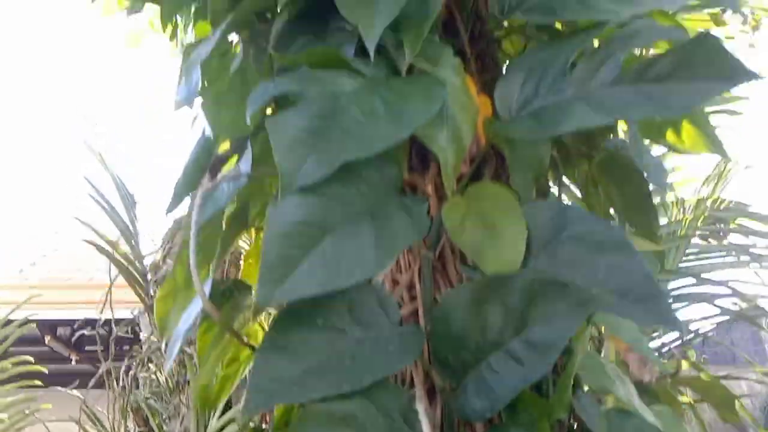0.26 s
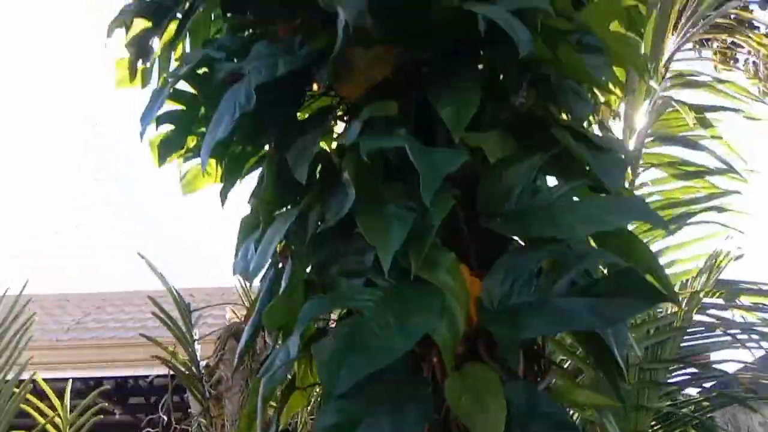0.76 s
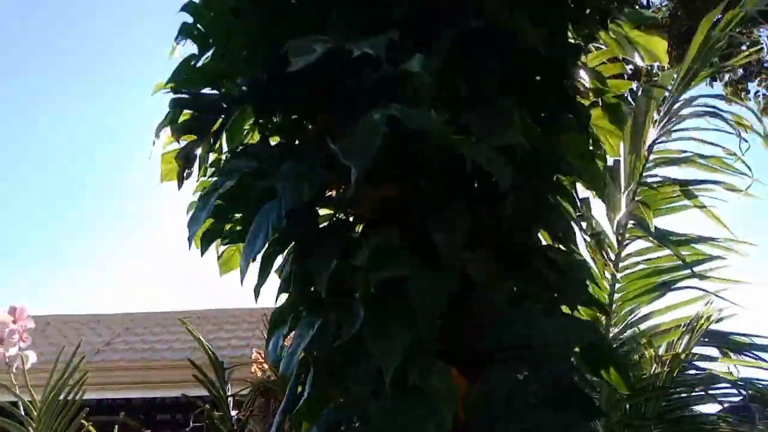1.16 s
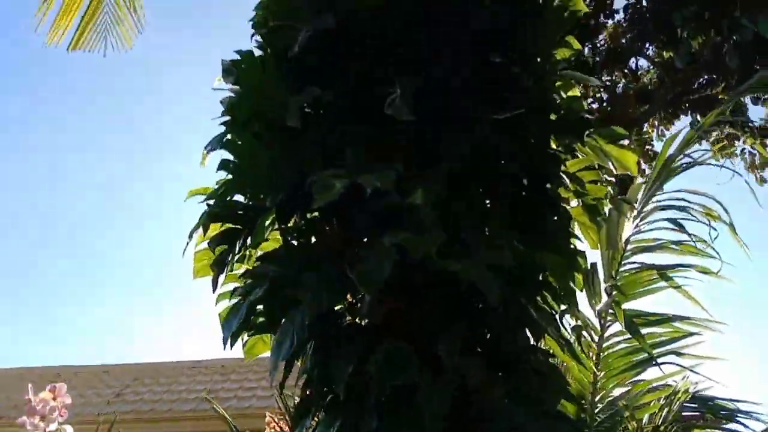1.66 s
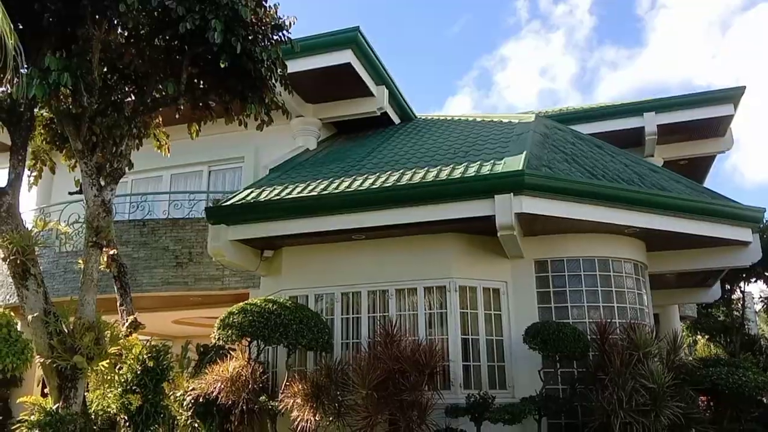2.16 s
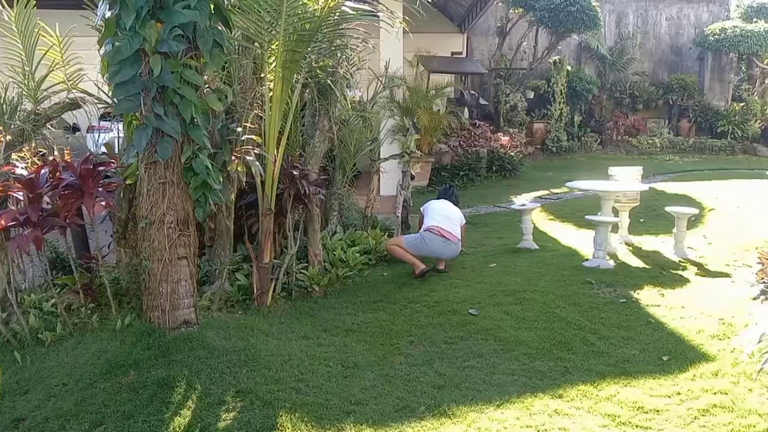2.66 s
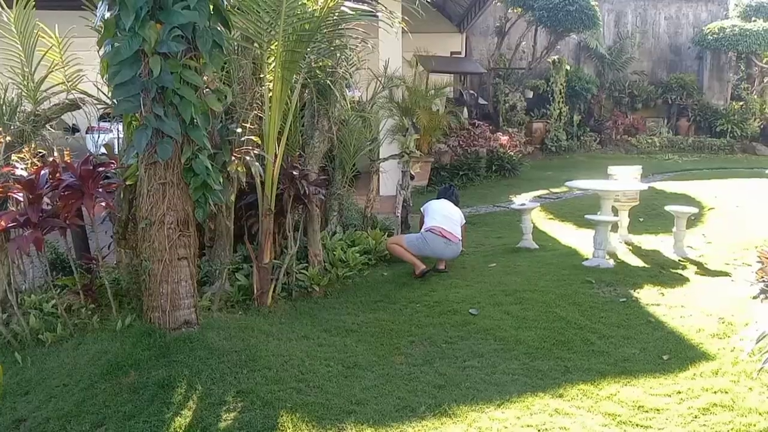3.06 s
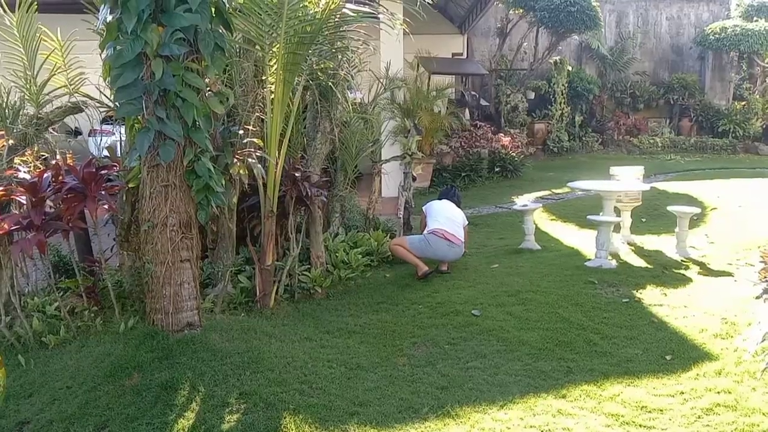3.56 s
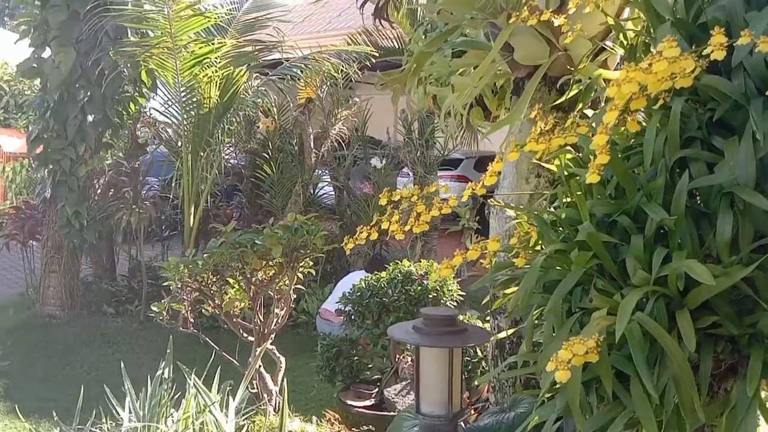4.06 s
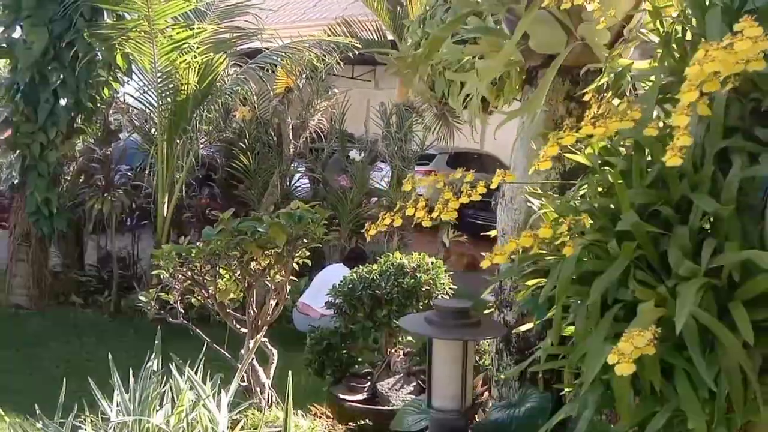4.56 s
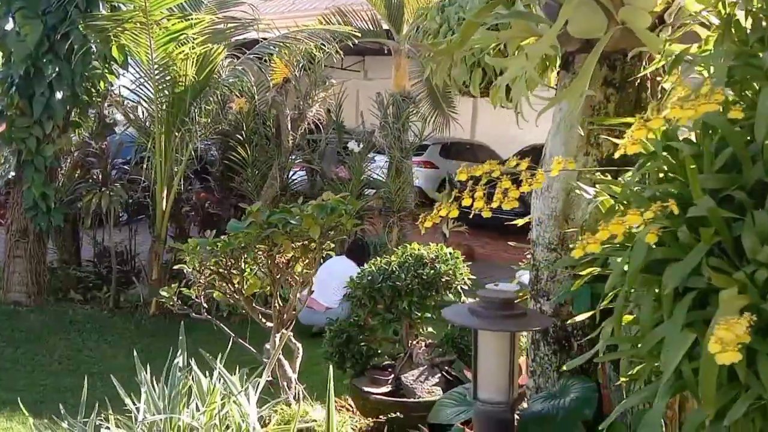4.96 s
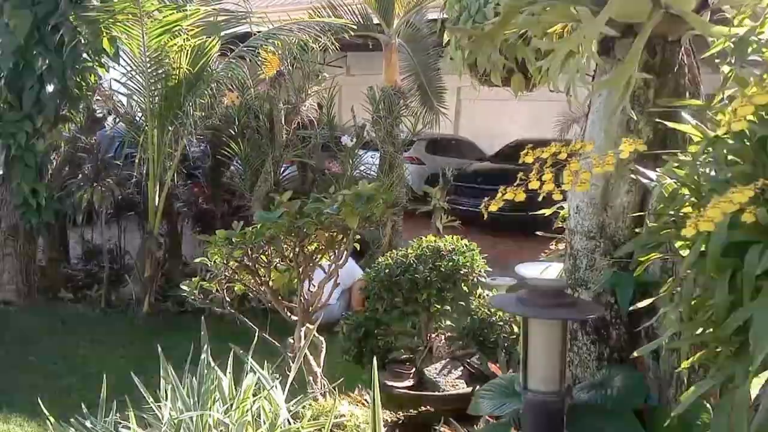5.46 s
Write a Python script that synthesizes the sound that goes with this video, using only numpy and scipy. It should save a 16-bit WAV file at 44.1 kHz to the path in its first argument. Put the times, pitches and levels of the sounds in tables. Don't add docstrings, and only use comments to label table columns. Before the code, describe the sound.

Long-bladed hand shears cut grass close to a small microphone in a quiet garden. At once a scrape leads to a double clack around 0.25 s, with an opening rasp at 0.35, another clack at 0.56 and a harder one at 0.87. A tight cluster of clacks and grinding follows from 1.14 to 1.3 s, with strong grass rustle, then a brief lull of soft brushing. Snips return at 1.8-1.9 s, with a rasp near 2.07. Then brighter, more separate cuts fall at about 2.56, 2.85, 3.32 and 3.6 s. After a pause with light ticks, a loud clack lands at 4.41 s, with a reopening rasp. Stalks snap and hiss along the blades throughout; grips hum softly in the first second and later knock dully. From 4.7 to the end, only faint sweeps over grass, tiny ticks, thin airy hiss and weak low rumble remain.

```python
import sys
import numpy as np
from scipy import signal
from scipy.fft import rfft, irfft
from scipy.io import wavfile
from scipy.ndimage import uniform_filter1d

SR = 44100
rng = np.random.default_rng(int(sys.argv[2]) if len(sys.argv) > 2 else 0)


def unload_wav(signal):
    wavfile.write(
        sys.argv[1],
        SR,
        np.round(np.clip(np.atleast_2d(signal).T, -1, 1) * 32767).astype(np.int16),
    )


def amplitude_ratio(level_db):
    exponent = np.asarray(level_db, float) / 20
    return 10 ** exponent


N = 252252

# t/s, level/dB
RUMBLE_LEVEL = [(0, -59.5), (.13, -54.5), (.83, -54.5), (.87, -61.5), (1.1, -62.5), (1.55, -58.5),
                (1.75, -69), (2.1, -61.5), (2.5, -71.5), (2.66, -61.5), (3.2, -66), (3.45, -62),
                (3.8, -61.5), (4, -69.5), (4.2, -61.5), (4.58, -58.5), (4.65, -72), (5.72, -67.5)]
# f/Hz, density/dB per Hz
AIR_SPECTRUM = [(290, -35.5), (500, -4.5), (1990, -9), (3100, -6), (4020, -17.5), (6640, -2), (15500, -20)]
# f/Hz, width/Hz, level/dB
LEANING_MODES = [(5660, 180, -10.5), (6960, 520, 4.5), (8000, 250, -9), (10130, 250, -7), (10500, 250, -11)]

# f/Hz, width/Hz, level/dB
GRASS_LOW_MODES = [(2000, 500, -11), (2700, 400, -6), (3400, 550, 0)]
GRASS_BODY_MODES = [(5100, 450, -2), (5700, 500, 0), (6400, 450, -1), (7050, 450, -4)]
GRASS_TOP_MODES = [(8360, 510, -14), (10100, 600, -10.5), (12000, 9900, -2), (14300, 2000, -4)]
# f/Hz, width/Hz, level/dB
GRASS_PRESSED_MODES = [(1400, 350, -0.5), (2300, 450, -3), (3600, 800, 0)]
# t/s of most pressure, level/dB, low modes rel/dB,
# rise/ms per 10 dB, fall/ms per 10 dB
GRASS_STROKES = [(0.062, -33, -5.5, 38, 64), (0.239, -29.5, -8, 25.5, 9), (0.349, -28, -8.5, 27, 20),
                 (.65, -32.5, -9, 47.5, 50.5), (.87, -43, 0, 44.5, 49), (0.959, -35, -1.5, 15.5, 26),
                 (1.261, -23, -11, 26.5, 18), (1.888, -25, -11.5, 8.5, 15.5), (2.041, -29.5, -43, 19, 32.5),
                 (2.079, -35, 1.5, 24, 21), (2.2, -54, -2.5, 4, 22), (2.543, -37, -3.5, 13.5, 32),
                 (2.64, -56, -7, 66, 37), (2.849, -39, -4, 26, 54), (2.939, -43, 0, 66, 56.5),
                 (3.33, -43.5, 1.5, 14, 66.5), (3.61, -44.5, -0.5, 85.5, 32), (3.711, -39.5, -3, 64.5, 47),
                 (4.401, -31, -8, 30, 25.5), (4.48, -31.5, -4, 20, 27.5)]
# start t/s, hold/s, level/dB, low modes rel/dB
PRESSED_HOLDS = [
    (0.537, 0.062, -48.5, 1.5),
    (0.709, 0.074, -46, -6),
    (1.148, 0.055, -37.5, -4.5),
    (1.494, 0.11, -66.5, 11.5),
    (1.706, 0.061, -72.5, 16),
    (1.817, 0.059, -47, 3),
    (1.95, 0.11, -59.5, 4),
]
# start t/s, hold/s, level/dB, top modes rel/dB, fall/ms per 10 dB
LAWN_SWEEPS = [
    (1.364, 0.19, -48.5, -4.5, 44),
    (3.397, 0.12, -43.5, -4, 59),
    (3.81, 0.063, -83, 24, 85),
    (4.138, 0.17, -51.5, -1, 28.5),
    (4.857, 0.16, -65.5, 0, 57),
    (5.034, 0.1, -57.5, -2.5, 52),
    (5.72, 0.015, -55.5, -1.5, 44),
]
# t/s, gain of the top modes/dB
BLADE_FACING = [
    (0, -15),
    (.6, -13),
    (1.25, -11.5),
    (1.9, -11.5),
    (2.2, -3.5),
    (2.55, 1),
    (3.0, -0.5),
    (3.7, -3.5),
    (4.5, -6.5),
]

# f/Hz, width/Hz, level/dB
STEEL_LOW_MODES = [(1020, 310, -8.5), (1275, 570, 3), (1834, 750, 0.5)]
STEEL_BODY_MODES = [(2226, 680, -5), (2903, 970, -1.5), (3620, 930, -1.5), (4311, 720, -3.5),
                    (4780, 1400, 3), (5482, 870, 1), (6030, 730, 1.5), (6714, 880, 3.5), (7820, 740, -2.5)]
STEEL_TOP_MODES = [(8800, 600, -7), (9600, 600, -6), (10900, 700, -4), (11900, 700, 0), (13100, 800, 1),
                   (14400, 850, -2)]
# f/Hz, width/Hz, level/dB
GRIP_MODES = [(514, 110, -32.5), (687, 94, -38), (907, 200, -25.5)]
# t/s, peak level/dB, low modes rel/dB, fall/ms per 10 dB
HARD_CLACKS = [(0.229, -10, -11.5, 2.5), (0.259, -9, -6, 6.5), (0.563, -7.5, -5.5, 7.5),
               (0.8722, -6.5, -0.5, 2), (0.877, -12, -7.5, 4), (0.957, -22.5, -13, 13),
               (1.1414, -12.5, -13, 5), (1.1837, -6, -3.5, 3), (1.193, -19.5, -15, 7.5),
               (1.2411, -18, -23.5, 14.5), (1.2989, -7.5, -16, 5), (1.7805, -18.5, -2.5, 11.5),
               (1.9094, -18, -20.5, -0.5), (1.9129, -13, -8, 7.5), (2.558, -11, -2.5, 7),
               (2.5668, -21.5, -4.5, 13), (2.8468, -10.5, 1.5, 5.5), (2.8526, -11, -11, 5),
               (3.324, -6.5, -4.5, 9), (3.6078, -8.5, -5.5, 7), (3.679, -30.5, -39, 12),
               (3.7695, -22.5, -19, 9), (4.4104, -4, -7.5, 3), (4.417, -7.5, -19, 5),
               (4.509, -29.5, -6.5, 14.5)]
# t/s, peak level/dB, low modes rel/dB, brightness/dB
LIGHT_TICKS = [(0.2131, -25, -30.5, -14), (0.7344, -25, -13.5, -5), (0.8194, -27.5, -18, -4.5),
               (1.1115, -33, -27.5, -24), (1.259, -33, 8.5, 26.5), (2.102, -22, -9, -6),
               (2.204, -39, -35, -9), (2.4156, -67, -28, 12), (2.4912, -50.5, -14, -4),
               (2.6512, -27, -8, 7.5), (2.759, -49.5, -4, 0), (2.8174, -33.5, -12, 6.5),
               (2.996, -29, -20.5, 2.5), (3.0589, -44, -28, 1), (3.842, -70, -18, 27.5),
               (3.887, -61, -7, 19), (4.002, -51, -19, 2), (4.191, -29, -19, -22), (4.5776, -43, -25, -3),
               (4.632, -54.5, -25, 1), (5.3908, -68, -28.5, 10), (5.449, -57, -7, -3.5)]
# t/s, peak level/dB, low modes rel/dB, brightness/dB
STALK_SNAPS = [(.057, -16.5, -22, -7), (.301, -34.5, -3.5, 0), (.3245, -25.5, -36, 0),
               (.4368, -44, -28, -9), (.538, -38.5, -21.5, -5.5), (.549, -35.5, -15, -5),
               (.626, -22.5, -11, 6), (.6448, -31.5, -14, -17), (.7265, -43, 0, 0),
               (1.224, -33, -11.5, -0.5), (1.2825, -20, -9, -0.5), (1.3625, -36, -9.5, -3),
               (1.384, -35, -23, -3.5), (1.814, -37, -13, -6), (1.8445, -23.5, -21, -4),
               (1.9015, -23, -16, -9), (2.0225, -28, -30, -14), (2.046, -29, -33, -2.5),
               (2.0665, -19.5, -4.5, -11), (2.5975, -32.5, -29, -2.5), (2.6285, -26, -20.5, -6),
               (2.833, -24.5, -20, -0.5), (2.8705, -34.5, -34, 0), (2.8738, -31, -25.5, 2.5),
               (2.9145, -34.5, -21.5, 4), (3.053, -43, -18, -2), (3.418, -25.5, -1.5, 16.5),
               (3.58, -38, -29, 5), (3.6115, -15.5, -25, 6), (3.6855, -28, -22.5, 8.5),
               (3.692, -32, -31, 13), (3.7855, -47, -18, 12), (4.368, -43, -12, -5),
               (4.555, -53, -23, 11.5)]
# peak t/s, level/dB, low modes rel/dB, spread/ms per 10
# dB
CLOSING_RASPS = [(0.2436, -11, -13.5, 7.5), (0.5227, -44, 7.5, 19.5), (0.5447, -22.5, -8, 15.5),
                 (0.7753, -38.5, -22, 5.5), (0.8422, -25, -6.5, 18.5), (0.8587, -35.5, 0.5, 6.5),
                 (1.166, -23, 1, 13), (1.8433, -16, -4.5, 7.5), (1.8664, -25, -1, 0),
                 (1.8846, -25.5, 1.5, 24), (2.193, -50, -37, -2), (2.5419, -20, -5, 8),
                 (2.6112, -17.5, -20, 9.5), (2.8354, -25, -2.5, 11), (3.269, -50, -33, 5),
                 (3.3144, -20, -6, 12), (3.596, -26, -4.5, 9.5), (4.1522, -49.5, -22, 34),
                 (4.395, -26.5, 0.5, 16), (4.4685, -18.5, -25, 7.5)]
OPENING_RASPS = [(0.0648, -19.5, -13, 13), (0.3264, -30, -42, 5.5), (0.3333, -16, -52, 0.74),
                 (0.3494, -19.5, -20, 13), (0.365, -26.5, -3, 12), (0.376, -34.5, 4.5, 22),
                 (0.4438, -52, -31, 8), (0.6468, -14, -13.5, 10.2), (.661, -36.5, 5.5, 39),
                 (0.984, -46, 10.5, 20.6), (0.9925, -24, -2, 0.64), (1.2085, -31.5, 2, 5.4),
                 (1.273, -22, -8, 23), (1.2847, -32.5, -5, 2.1), (1.9548, -50, 3, 10),
                 (2.0305, -33, -32, 13), (2.0673, -46, -22, 11), (2.081, -20.5, -41, 3.3),
                 (2.134, -50, 2, 6.6),
                 (2.6325, -22.5, -10.5, 23), (2.669, -43.5, -8, 34), (2.8713, -24.5, 6, 0.99),
                      (2.9012, -31, -22, 25), (2.9298, -24.5, -8, 12), (2.975, -45, 2, 6.3),
                      (2.984, -35, -9.5, 3.4), (3.356, -39, -1, 18), (3.3897, -32, -34.5, 20),
                      (3.4047, -36.5, -39.5, 13), (3.4205, -25.5, -11.5, 11), (3.4427, -46.5, -5, 43),
                      (3.685, -28.5, -40, 14), (3.7135, -20, -5, 10.7), (4.4861, -20.5, -21, 8.6)]
# t/s, f/Hz, level over the other modes/dB
SINGING_MODES = [(0.057, 4900, 2.5), (0.065, 6700, 4), (0.066, 2170, 15), (0.068, 5550, 17),
                 (0.23, 5450, 19), (0.242, 5800, 10), (0.245, 2344, 23), (0.26, 2890, 13.5),
                 (0.26, 7250, 14), (0.263, 12000, -1), (0.347, 5360, 14), (0.354, 2220, 12),
                 (0.365, 2400, 21.5), (0.368, 5570, 11.5), (0.382, 1360, 24.5), (0.511, 1430, 25),
                 (0.535, 1440, 14.5), (0.553, 5060, 16.5), (0.565, 1220, 11), (0.64, 6900, 7.5),
                 (0.646, 4870, 19.5), (0.649, 2230, 18.5), (0.661, 5500, 19), (0.676, 1330, 20),
                 (0.737, 5180, 26), (0.842, 5560, 9.5), (0.874, 1187, 15), (0.873, 3237, 8.5),
                 (0.874, 5410, 6.5), (0.965, 2280, 28.5), (1.144, 1190, 14.5), (1.145, 5960, 6),
                 (1.16, 5450, 13.5), (1.162, 6540, 9.5), (1.166, 2470, 20.5), (1.186, 1210, 5.5),
                 (1.231, 1380, 15.5), (1.244, 6630, 12), (1.251, 1700, 17), (1.26, 5650, 13.5),
                 (1.273, 5860, 7.5), (1.285, 5120, 17), (1.3, 5970, 22), (1.301, 15400, 15.5),
                 (1.302, 2950, 21.5), (1.781, 5210, 19.5), (1.784, 1350, -3), (1.784, 6840, 15.5),
                 (1.826, 1390, 18.5), (1.844, 1333, 29), (1.845, 5950, 5), (1.883, 1690, 45),
                 (1.886, 4940, 13), (1.889, 5860, 12.5), (1.916, 1240, 5), (1.916, 3430, 5),
                 (1.916, 5450, 9),
                 (2.047, 13700, 16), (2.067, 1770, 18.5), (2.067, 4880, 21), (2.069, 3730, 16),
                      (2.081, 6300, 12), (2.08, 14740, 5), (2.076, 1050, -18), (2.083, 1740, 9),
                      (2.101, 1365, 14), (2.102, 5340, 24), (2.545, 6010, 9), (2.559, 7110, 5.5),
                      (2.61, 7000, 11), (2.611, 11720, 6.4), (2.632, 13670, 14), (2.633, 2200, 8.7),
                      (2.654, 10940, 6.6), (2.835, 4704, 12), (2.851, 1220, 15), (2.852, 7635, 10.6),
                      (2.931, 3573, 10), (2.998, 13100, 15), (3.311, 2930, 9.5), (3.313, 4917, 10),
                      (3.328, 8020, 7), (3.328, 13500, 6), (3.404, 13200, 15), (3.42, 13090, 13),
                      (3.583, 4670, 20), (3.593, 13020, 13), (3.599, 4740, 11), (3.609, 1270, 12),
                      (3.61, 3510, 9.9), (3.683, 1540, 18), (3.688, 13820, 7.7), (3.688, 14970, 11),
                      (3.707, 4624, 24), (3.712, 1050, -17), (4.003, 7570, 22), (4.193, 3126, 34),
                      (4.193, 4680, -7), (4.381, 6030, 13), (4.394, 5790, 11), (4.41, 3043, 16),
                      (4.41, 6090, 14), (4.413, 1160, 20), (4.419, 9050, 9), (4.421, 14800, 11),
                      (4.468, 6880, 26), (4.484, 6050, 8), (4.487, 3453, 13), (4.489, 2274, 18),
                      (4.579, 6740, 31.5), (4.634, 7000, 22)]

# start t/s, length/s, level/dB, f/Hz
GRIP_HUMS = [
    (.13, .1, -62, 430),
    (0.144, 0.08, -67.5, 528),
    (0.236, 0.12, -54.5, 422),
    (.38, 0.16, -66, 546),
    (0.483, 0.042, -63, 395),
    (0.555, .14, -53, 400.3),
    (.58, .09, -54, 320),
    (.69, 0.13, -51, 331),
    (.7, 0.22, -54.5, 392),
]
# t/s, peak level/dB, f/Hz, t60/s
GRIP_KNOCKS = [(1.782, -35.5, 690, 0.051), (1.851, -48.5, 486, 0.26), (2.067, -42, 885, 0.13),
               (2.563, -39, 449, 0.15), (2.614, -40, 418.5, 0.16), (2.678, -45, 425, 0.083),
               (2.85, -48.5, 466, 0.16), (3.328, -43, 420, 0.34), (3.418, -37, 905, 0.1),
               (3.613, -30.5, 427, 0.071), (4.412, -41, 430, 0.12)]


def rms_one(x):
    return x / np.sqrt(np.mean(x ** 2) + 1e-20)


def drift(rate):
    r = np.exp(-32 * np.pi * rate / SR)
    slow = signal.lfilter([1], [1, -2 * r, r * r], rng.standard_normal(N // 16 + 3002))[3000:]
    return np.interp(np.arange(N) / 16, np.arange(len(slow)), rms_one(slow))


def grit(shape, spread_db):
    grain_db = spread_db * np.minimum(rng.exponential(1, shape), 5)
    return rms_one(rng.standard_normal(shape) * amplitude_ratio(grain_db))


def resonate(x, hz, width):
    r = np.exp(-np.pi * width / SR)
    b = [1 - r * r, 0, r * r - 1]
    a = [2, -4 * r * np.cos(2 * np.pi * hz / SR), 2 * r * r]
    once = signal.lfilter(b, a, x + 1e-18)
    return signal.lfilter(b, a, once) * np.sqrt(2 * SR / (np.pi * width))


def gliding(x, hz, width):
    r = np.exp(-np.pi * width / SR)
    turn = np.exp(2j * np.pi * np.cumsum(hz) / SR)
    smooth = signal.lfilter([1], [1, -2 * r, r * r], x / turn)
    return rms_one((smooth * turn).real)


def rustle(modes, level_db, patchy_db, wander=0):
    flicker = [amplitude_ratio(patchy_db * drift(9)) for mode in modes]
    rings = 0
    for gain, (hz, width, db) in zip(flicker, modes):
        grains = grit(N, spread_db=2.0)
        if wander == 0:
            ring = resonate(grains, hz, width)
        else:
            ring = gliding(grains, hz * np.exp(wander * drift(3)), width)
        rings = rings + amplitude_ratio(db) * gain * ring
    return amplitude_ratio(level_db) * rms_one(rings)


def rumble():
    t = np.arange(N) / SR
    low_db = np.interp(t, *np.transpose(RUMBLE_LEVEL))
    settled_s = t - .845
    grip_db = low_db + np.where(settled_s < 0, -3, -6.5 - 2 * settled_s)
    low_modes = [(66, 50, -8), (92, 45, -7), (160.9, 150, -10.5)]     # f/Hz, width/Hz, level/dB
    grip_modes = [(255, 240, 3.5), (315.9, 45, -2.5), (408.6, 79, 2.5)]
    low = rustle(low_modes, low_db - 1 + 3.5 * drift(9), patchy_db=2)
    return low + rustle(grip_modes, grip_db, patchy_db=2.0)


def air():
    hz, db = np.transpose(AIR_SPECTRUM)
    bands = []
    for f in np.geomspace(600, 14000, 12):
        density_db = np.interp(np.log(f), np.log(hz), db)
        bands.append((f, .3 * f, density_db + 10 * np.log10(f)))
    return rustle(bands, -69 - 2.5 + 1.3 * drift(10), patchy_db=2.5)


def leaning_stalks():
    return rustle(LEANING_MODES, -73.5, patchy_db=5.5, wander=.03)


def facing_db(s):
    return np.interp(s, *np.transpose(BLADE_FACING))


def pressure_db():
    t = np.arange(0, N, 64) / SR
    stroke_top_db = 4
    moves = [(s, 0, db, low, facing_db(s) + stroke_top_db, rise, fall)
             for s, db, low, rise, fall in GRASS_STROKES]
    moves += [(s, hold, db, low, facing_db(s) + stroke_top_db, 13, 19)
              for s, hold, db, low in PRESSED_HOLDS]
    moves += [(s, hold, db, -7, top, 68, fall) for s, hold, db, top, fall in LAWN_SWEEPS]
    s, hold, db, low, top, rise, fall = np.transpose(moves)[:, :, None]
    before = np.maximum(s - t, 0) / np.maximum(rise, 1)
    after = np.maximum(t - s - hold, 0) / np.maximum(fall, 1)
    swell_db = db - 1e4 * (before + after)
    levels = []
    for rel, rest_db in [(0, -89.5), (low, -92), (top, -85.5)]:
        power = amplitude_ratio(2 * rest_db) + amplitude_ratio(2 * (swell_db + rel)).sum(axis=0)
        levels.append(np.interp(np.arange(N) / SR, t, 10 * np.log10(power)))
    return levels


def brushing():
    body_db, low_db, top_db = pressure_db()
    pressure = np.clip((body_db + 49.5) / 25, 0, 1)
    stutter = amplitude_ratio(pressure * (6 * drift(150) - 5))
    pressed_db = low_db - 20 + 29 * np.clip((low_db + 58) / 16, 0, 1)
    hiss = rustle(GRASS_LOW_MODES, low_db - 1.5, patchy_db=2.5, wander=.035)
    hiss += rustle(GRASS_PRESSED_MODES, pressed_db, patchy_db=4, wander=.06)
    hiss += rustle(GRASS_BODY_MODES, body_db, patchy_db=3, wander=.03)
    hiss += rustle(GRASS_TOP_MODES, top_db, patchy_db=1.5)
    return signal.sosfilt(signal.butter(4, 950, "high", fs=SR, output="sos"), stutter * hiss)


def contacts():
    blows = [(s, db, low, .1, fall) for s, db, low, fall in HARD_CLACKS]
    blows += [(s, db, low, .1, 3.5) for s, db, low, bright in LIGHT_TICKS]     # fall, ms per 10 dB
    blows += [(s, db, low, .1, 1.2) for s, db, low, bright in STALK_SNAPS]
    rasps = [(s, db, low, 0.37 * ms, 0.48 * ms) for s, db, low, ms in CLOSING_RASPS]
    rasps += [(s, db, low, 0.3 * ms, 1.1 * ms) for s, db, low, ms in OPENING_RASPS]
    s, peak_db, low_db, rise_ms, fall_ms = np.transpose(blows + rasps)[:, :, None]
    top_db = facing_db(s) - 0.39 * (low_db + 13)
    top_db[len(HARD_CLACKS):len(blows), 0] += np.transpose(LIGHT_TICKS + STALK_SNAPS)[3]
    is_blow = np.arange(len(s))[:, None] < len(blows)
    weight_db = np.where(is_blow, 6 + 1.2 * low_db, -5.0 - 0.27 * (top_db + 9.5))
    return len(blows), s, peak_db, low_db, top_db, rise_ms, fall_ms, weight_db


def singing(s, hz):
    at, pitch, db = np.transpose(SINGING_MODES)[:, :, None, None]
    reach_s, reach_log_pitch = .007, .07
    apart = np.log(pitch / hz)
    now = np.exp(-.5 * ((s - at) / reach_s) ** 2)
    near = np.exp(-.5 * (apart / reach_log_pitch) ** 2)
    nearest = abs(apart) == abs(apart).min(axis=-1, keepdims=True)
    pull = abs(db) * now * np.sqrt(near) * nearest
    shift = (pull * apart).sum(axis=0) / (pull.sum(axis=0) + 1)
    return (db * now * near).sum(axis=0), hz * np.exp(shift)


def ring_shape(hz, width, size):
    r = np.exp(-np.pi * width / SR)
    z = np.exp(-2j * np.pi * np.arange(size // 2 + 1) / size)
    poles = 1 + r * r * z * z - 2 * r * np.cos(2 * np.pi * hz / SR) * z
    once = (1 - r * r) / 2 * (1 - z * z) / poles
    return once * once * np.sqrt(2 * SR / (np.pi * width))


def blades():
    half = 3072
    blows, s, peak_db, low_db, top_db, rise_ms, fall_ms, weight_db = contacts()
    start = (s * SR).astype(int)
    ms = np.arange(-half, half) * 1000 / SR
    rising = ms / np.maximum(2.1 * rise_ms, .1)
    falling = -ms / np.maximum(0.78 * fall_ms - .6, .3)
    slope_db = 10 * np.where(ms < 0, rising, falling)
    bursts = grit((len(s), 2 * half), spread_db=3.0) * amplitude_ratio(peak_db + slope_db)
    bursts[:blows, half] = 7.5 * amplitude_ratio(peak_db[:blows, 0])

    where = (start + np.arange(2 * half)).ravel()
    crackle_db = 4 * drift(300)[np.clip(where - half, 0, N - 1)].reshape(bursts.shape) - 2
    bursts[blows:] *= amplitude_ratio(crackle_db[blows:])

    crack = amplitude_ratio(peak_db + 0.5 * weight_db + 6.5)[:blows, 0]
    pulses = np.bincount(start[:blows, 0], crack, N)
    out = signal.sosfilt(signal.butter(2, [1000, 4500], "band", fs=SR, output="sos"), pulses)

    uneven_db = np.where(rise_ms < .15, 2.0, 3.0)
    colour = 0
    regions = [(STEEL_LOW_MODES, low_db - 5.0), (STEEL_BODY_MODES, -3.0), (STEEL_TOP_MODES, top_db - 3.0)]
    for modes, region_db in regions:
        mode_hz, _, mode_db = np.transpose(modes)
        heavy = (2000 < mode_hz) & (mode_hz < 4300)
        sing_db, ring_hz = singing(s, mode_hz)
        chance_db = uneven_db * rng.standard_normal((len(s), len(modes)))
        share = amplitude_ratio(mode_db + heavy * (weight_db + 7.0) + sing_db + chance_db)
        share /= np.linalg.norm(share, axis=1, keepdims=True)
        for k, (hz, width, db) in enumerate(modes):
            ring = ring_shape(ring_hz[:, k:k + 1], min(width, 190 + .05 * hz), 2 * half)
            colour = colour + (-1) ** k * amplitude_ratio(region_db) * share[:, k:k + 1] * ring
    rung = irfft(rfft(bursts) * colour)
    out += np.bincount(where, rung.ravel(), N + 2 * half)[half:half + N]

    bursts[blows:] *= amplitude_ratio(-12)
    shaking = amplitude_ratio(low_db + 0.23 * (peak_db + 16.0)) * bursts
    jolt = np.bincount(where, shaking.ravel(), N + 2 * half)[half:half + N]
    return out + sum(amplitude_ratio(db) * resonate(jolt, hz, width) for hz, width, db in GRIP_MODES)


def garden(x):
    delays = [(.003, -25.5), (.011, -28.5), (.027, -37)]     # t/s, level/dB
    echoes = sum(amplitude_ratio(db) * np.roll(x, int(s * SR)) for s, db in delays)
    return x + signal.lfilter([.6], [1, -.4], echoes)


def hums():
    t, out = np.arange(N) / SR, 0
    waver = np.cumsum(1 + .02 * drift(20)) / SR
    for s, length, db, hz in GRIP_HUMS:
        swell = np.sin(np.pi * np.clip((t - s) / length, 0, 1)) ** .5
        out = out + amplitude_ratio(db) * swell * np.sin(2 * np.pi * hz * waver)
    return out * amplitude_ratio(4.4 * drift(40))


def grips():
    t, out = np.arange(N) / SR, 0
    for s, db, hz, t60 in GRIP_KNOCKS:
        age = np.maximum(t - s, 0)
        envelope = (1 - np.exp(-age / 0.0058)) * amplitude_ratio(db - 60 * age / t60)
        out = out + envelope * np.sin(2 * np.pi * hz * age)
    return out * amplitude_ratio(4.7 * drift(60) + 1.0)


def scene():
    ground = rumble() + air()
    grass = leaning_stalks() + brushing()
    return (ground + grass + garden(blades()) + hums() + grips())[None]


def hiss_remover(x):
    threshold_db, depth_db, lowest_hz = -94.5, -8.5, 1800
    hz, t, cells = signal.stft(x, SR, nperseg=512)
    over = np.minimum(abs(cells) ** 2 / amplitude_ratio(2 * threshold_db), 12)
    over = uniform_filter1d(over, size=9, axis=-1)
    gain = np.maximum(1.09 - 1 / (over + 1e-9), amplitude_ratio(depth_db))
    gain[..., hz < lowest_hz, :] = 1
    return signal.istft(cells * gain, SR, nperseg=512)[1][..., :N]


def band_limit(x):
    return signal.sosfilt(signal.butter(12, 16630, fs=SR, output="sos"), x)


def record(dry):
    shaved = dry - 1.2 * np.tanh(dry / 1.2)
    excess = signal.sosfilt(signal.butter(2, 500, "high", fs=SR, output="sos"), shaved)
    rounded = hiss_remover(dry - excess)
    mix = signal.sosfilt(signal.cheby2(16, 32, 15650, fs=SR, output="sos"), rounded)
    return band_limit(mix)


dry = scene()
out = record(dry)
unload_wav(out)
```